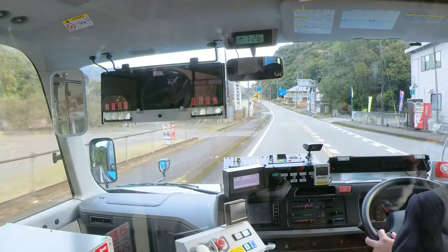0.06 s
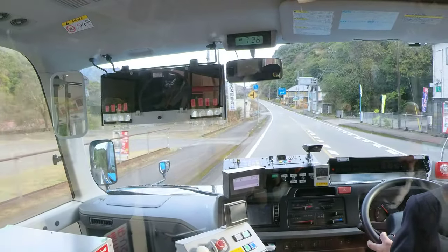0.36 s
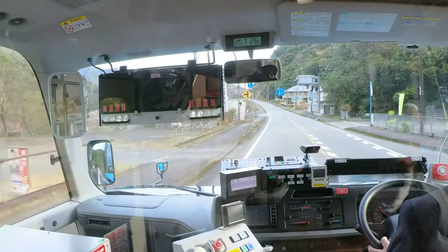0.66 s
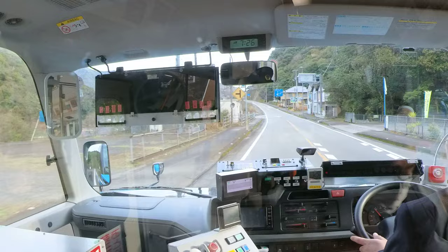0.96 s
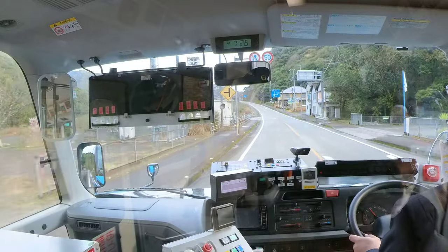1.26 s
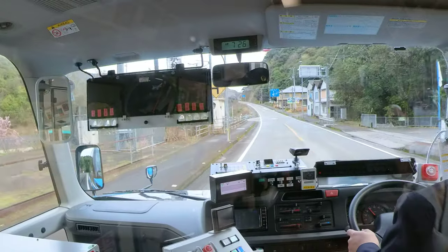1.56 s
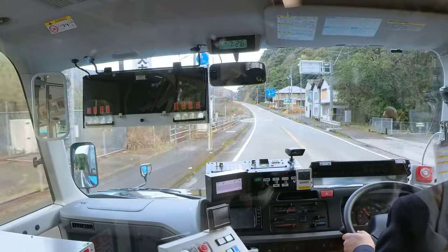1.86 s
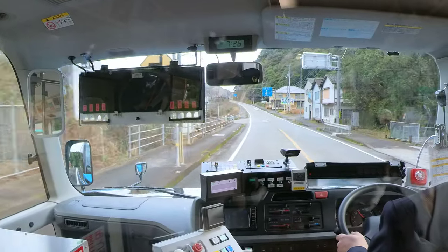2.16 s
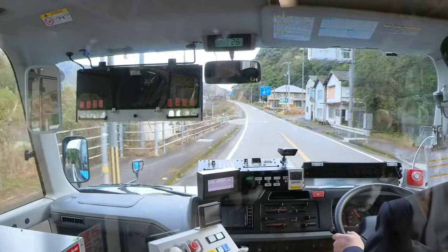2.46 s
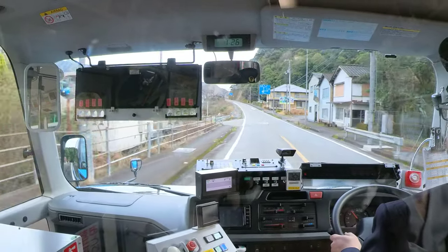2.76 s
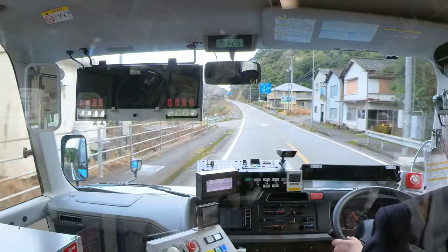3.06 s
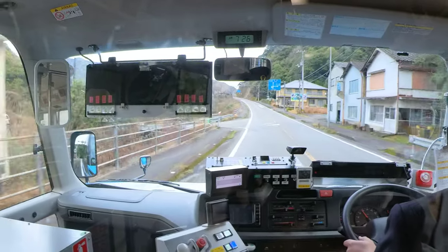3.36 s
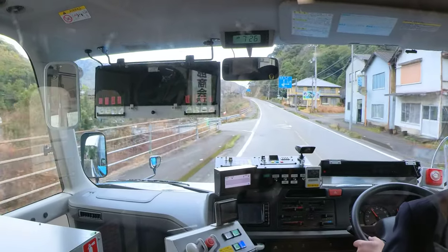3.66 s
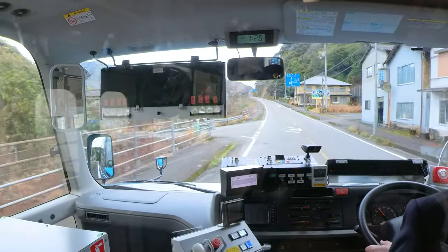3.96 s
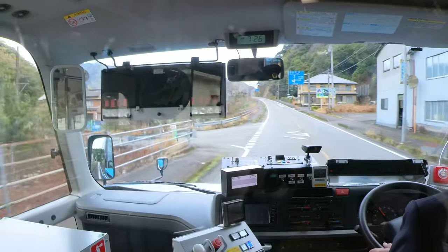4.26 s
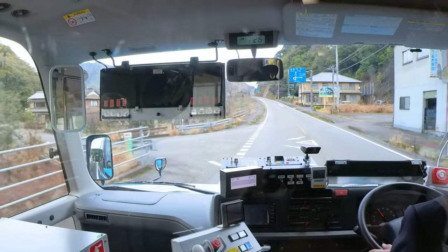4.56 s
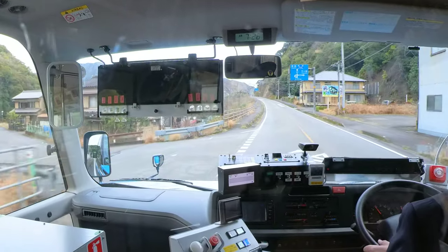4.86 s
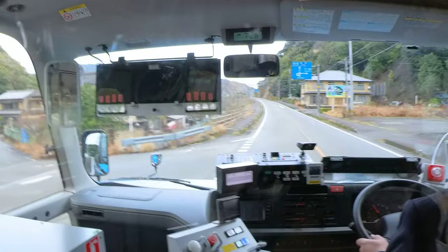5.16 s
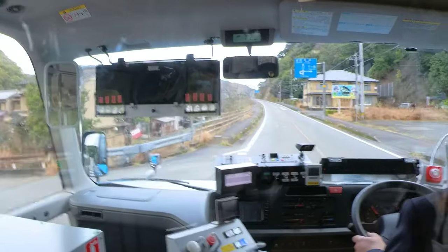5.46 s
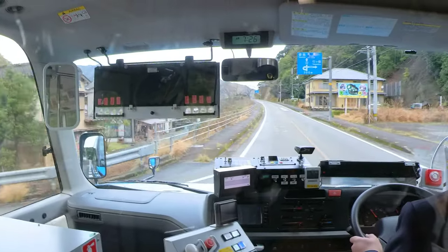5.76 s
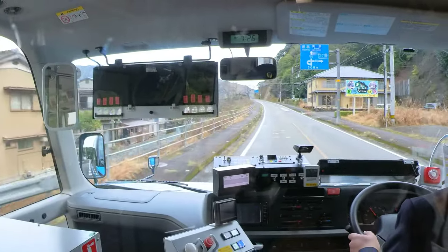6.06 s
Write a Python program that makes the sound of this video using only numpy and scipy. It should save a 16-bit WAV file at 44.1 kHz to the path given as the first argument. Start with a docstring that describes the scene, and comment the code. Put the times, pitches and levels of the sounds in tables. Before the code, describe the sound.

A minibus cruises along a road, heard from the cabin: tyres hum, the engine drones faintly, and bumps rattle the interior.

```python
"""Inside a minibus cruising on a country road. The tyre treads roar, the suspension rumbles and the air
in the tyres hums with a steady beat, all over a faint engine. Bumps knock the cabin panels, jingle
small metal fittings and make the trim squeak. Near the end the wheels slam into rough asphalt,
which sets the whole cabin clattering."""
import sys
import numpy as np
from scipy import signal
from scipy.fft import rfft, irfft, next_fast_len
from scipy.io import wavfile
from scipy.ndimage import map_coordinates

SR = 44100
rng = np.random.default_rng(int(sys.argv[2]) if len(sys.argv) > 2 else 0)


def wrap_up_sound(samples):
    """Save the sound to the file named by the first command line argument, as 16-bit audio."""
    columns = np.atleast_2d(samples).T
    # keep every value between -1 and 1, then stretch to whole-number steps
    tamed = np.clip(columns, -1, 1)
    steps = np.round(tamed * 32767).astype(np.int16)
    wavfile.write(sys.argv[1], SR, steps)


N = 269892
TIME = np.arange(N) / SR


# fader ride of the tread roar: (time [s], level [dB])
ROAR_LEVEL = [(0.0, -26), (0.8, -24), (1.26, -25.5), (5.1, -24.5), (5.35, -19.5), (5.71, -19.5),
              (6.12, -23)]
# its colour, full in the low mids: (frequency [Hz], relative level [dB])
ROAR_EQ = [(150, -38), (280, 1.5), (360, 0), (450, 2.5), (570, 0), (720, -3.5), (920, -3), (1250, -12),
           (1900, -21), (2700, -24), (3100, -30), (4200, -31.5), (5800, -57.5), (16000, -74.5)]
def tyre_roar():
    """Treads rolling on asphalt make a broad roar whose level wavers slightly."""
    return amp(automation(ROAR_LEVEL) + 0.64 * wobble(11)) * cabin_noise(ROAR_EQ)


# fader ride of the tyre hum: (time [s], level [dB])
HUM_LEVEL = [(0, -26), (1.1, -28), (2.6, -23.5), (3.25, -27), (4.3, -23.5), (6.12, -24)]
def cavity_hum():
    """Rolling splits the air resonance of a tyre into two close notes, which beat at a steady rate."""
    beat_hz, first_crest_s = 6.88, .104
    centre_hz = 238.5 + 1.4 * TIME + 1.5 * wobble(14)
    phase = 2 * np.pi * np.cumsum(centre_hz) / SR
    split = np.pi * beat_hz * (TIME - first_crest_s)
    upper, lower = np.sin(phase + split), np.sin(phase - split)
    return amp(automation(HUM_LEVEL) + 1.05 * wobble(8.4)) * (upper + 0.63 * lower)


# rough patches of asphalt:
# (start [s], length [s], rumble level [dB], panel level [dB], fitting level [dB])
PATCHES = [(0.8, 0.24, -22, -24, -38.5), (3.785, 0.072, -21, -29, -38), (4.189, 0.25, -24.5, -28.5, -41),
           (4.421, .13, -29.5, -27, -44), (5.142, .28, -15, -14, -20.5), (5.45, 0.13, -16.5, -18.5, -26.5),
           (5.583, 0.13, -14, -18.5, -29), (5.712, .22, -17, -26.5, -33), (5.939, 0.074, -19, -20, -24.5)]
def shaking(part, attack_s, sag_db_per_s, release_db_per_s):
    """Envelope of a shaken part: it builds up, sags while on a rough patch and dies away after it."""
    column = ("rumble", "panels", "fittings").index(part)
    power = np.zeros(N)
    for start, length, *levels in PATCHES:
        age = np.maximum(TIME - start, 0)
        sag = sag_db_per_s * np.minimum(age, length)
        release = release_db_per_s * np.maximum(age - length, 0)
        power += (amp(levels[column] - sag - release) * np.minimum(age / attack_s, 1)) ** 2
    return np.sqrt(power)


# bed of rumble under the patches: (time [s], level [dB])
RUMBLE_LEVEL = [(0, -28), (3.1, -29), (4.5, -26.5), (6.12, -22.5)]
# its bass-heavy colour: (frequency [Hz], relative level [dB])
RUMBLE_EQ = [(20, -43), (33, -34), (41, -22), (50, -28), (64, -7), (90, -1.5), (145, -2), (200, -3),
             (260, -2), (400, -21.5), (900, -64.5)]
def suspension_rumble():
    """The road rumbles through the suspension, swelling on each rough patch."""
    swells = shaking("rumble", attack_s=.03, sag_db_per_s=15, release_db_per_s=130)
    shocks = np.hypot(amp(automation(RUMBLE_LEVEL)), swells)
    return shocks * amp(1.05 * wobble(16)) * cabin_noise(RUMBLE_EQ)


# boxy panels, raspy trim and glittering metal: (frequency [Hz], relative level [dB])
PANEL_EQ = [(100, -84), (260, -4.5), (420, 6.5), (600, -2.5), (750, -16.5), (1150, -7.5), (1550, -10.5),
            (2000, -16), (2600, -16.5), (3100, -20), (4100, -18.5), (5500, -40.5), (10000, -51),
            (16000, -62.5)]
BUZZ_EQ = [(1200, -21), (2300, -2), (4000, -6), (5500, -21), (16000, -45.5)]
METAL_EQ = [(2500, -24.5), (5000, -14), (7000, -19.5), (8300, -14.5), (10000, -21), (10800, -10.5),
            (11700, -2.5), (13500, -2), (15600, -5.5), (16500, -1)]
def cabin_clatter():
    """Rough asphalt keeps panels and fittings in a dense clatter; hard shaking makes the trim buzz."""
    panel_shake = shaking("panels", attack_s=.014, sag_db_per_s=31, release_db_per_s=160)
    metal_shake = shaking("fittings", attack_s=.01, sag_db_per_s=25, release_db_per_s=220)
    clatter = unit(ringing(chatter(per_s=160, scatter_db=2), t60_s=.07, attack_s=.001))
    sizzle = unit(ringing(chatter(per_s=200, scatter_db=3), t60_s=.08, attack_s=.001))
    panels = panel_shake * cabin_noise(PANEL_EQ)
    buzz = amp(1) * panel_shake ** 2 * cabin_noise(BUZZ_EQ)
    metal = metal_shake * cabin_noise(METAL_EQ)
    return clatter * (panels + buzz) + sizzle * metal


# wheel slams: (time [s], level [dB])
JOLTS = [(5.137, -13.5), (5.185, -10.5), (5.235, -14), (5.599, -17.5)]
# dark colour of the shuddering body: (frequency [Hz], relative level [dB])
SHUDDER_EQ = [(50, -27), (130, -5.5), (260, -1), (400, 1.5), (600, 3), (750, -7), (1100, -6), (1600, -20),
              (4000, -38)]
def jolts():
    """The body shudders as the wheels hit broken asphalt."""
    times, db = np.transpose(JOLTS)
    return ringing(blows(times, db), t60_s=.35, attack_s=.003) * cabin_noise(SHUDDER_EQ)


# featured panel hits: (time [s], clack level [dB], thud over clack [dB])
KNOCKS = [(0.233, -22, 5.5), (0.3033, -25, 1.5), (0.7225, -29.5, 14.5), (0.8213, -21.5, 8.5),
          (0.885, -22.5, -3.5), (1.0248, -22.5, 0), (1.273, -29, -3), (1.401, -28.5, -12), (1.46, -28, -10),
          (2.068, -34, -9), (2.4817, -32, -7), (2.566, -31, 2.5), (2.734, -31, -8.5), (2.7721, -25, -4),
          (3.286, -25, 6), (3.671, -25, 0.5), (3.7766, -29.5, 15), (3.8534, -28.5, -7), (4.304, -22, 7.5),
          (4.365, -27, -2), (4.4274, -23.5, 6.5), (4.4923, -24.5, 5.5), (4.553, -23.5, 6.5),
          (5.264, -19.5, 5.5), (5.4752, -21, 11), (5.8105, -24.5, 15), (5.901, -23.5, -10.5),
          (6.0072, -21, 7.5)]
# how hard the road stirs the small taps and hops: (time [s], level [dB])
UNREST = [(0, -39), (1.4, -38.5), (2.3, -46), (2.75, -42.5), (3.05, -51), (3.7, -45.5), (4.4, -40),
          (6.12, -31.5)]
# hard clack and dull thud: (frequency [Hz], relative level [dB])
CLACK_EQ = [(500, -12.5), (900, -3.5), (1180, 9.5), (1270, -0.5), (1400, 9.5), (1730, 3.5), (1880, -8.5),
            (2700, -9), (4050, -18), (5500, -27.5), (10000, -34.5), (16000, -24.5)]
THUD_EQ = [(60, -34), (150, -0.5), (400, 2.5), (700, 0), (1200, -23), (3000, -64)]
def panel_knocks():
    """Bumps knock and tap the panels: a plastic clack over a thud, with more snap when the thud is light."""
    times, db, thud_db = np.transpose(KNOCKS)
    tap_thud_db, snap_per_thud = -4.5, -0.8  # the snap loses 0.8 dB for each dB of thud
    taps = amp(automation(UNREST) + 5.5) ** 2 * chatter(per_s=9, scatter_db=2.5)
    clacks = blows(times, db) + taps
    snaps = blows(times, db + snap_per_thud * thud_db) + taps * amp(snap_per_thud * tap_thud_db) ** 2
    thuds = blows(times, db + thud_db) + taps * amp(tap_thud_db) ** 2
    clack = ringing(clacks, t60_s=.13, attack_s=.001) * cabin_noise(CLACK_EQ)
    snap = ringing(snaps, t60_s=.17, attack_s=.00078) * cabin_noise(BUZZ_EQ)
    thud = ringing(thuds, t60_s=.1, attack_s=.00049) * cabin_noise(THUD_EQ)
    return clack + amp(-15.5) * snap + thud


def panel_boom():
    """A body panel booms once on a single low note."""
    peak_s, half_width_s, hz = 4.21, .026, 302
    swell = np.exp(-((TIME - peak_s) / half_width_s) ** 2)
    return amp(-18) * swell * tone(np.full(N, hz))


# featured hits of loose metal: (time [s], level [dB])
JINGLES = [(0.814, -24.5), (0.8664, -23), (0.999, -26), (1.564, -36), (2.836, -36.5), (3.6447, -32.5),
           (3.8023, -33), (4.148, -32), (4.28, -25), (4.486, -26.5), (4.5261, -25.5), (4.9312, -32),
           (5.1477, -11.5), (5.262, -12.5), (5.3727, -23.5), (5.4355, -15), (5.5174, -17.5)]
# thin colour of the tiny ticks: (frequency [Hz], relative level [dB])
TICK_EQ = [(6500, -39), (7900, -7.5), (8900, -2), (10500, -32)]
def jingles():
    """Loose metal lands with a click and bounces; in between it hops, trembles and faintly ticks."""
    times, db = np.transpose(JINGLES)
    bounce_times = times + .005 + .015 * rng.random(len(times))
    hops = chatter(per_s=17, scatter_db=3.5)
    tremble = amp(-9) ** 2 * chatter(per_s=46, scatter_db=5.5)
    stirring = amp(automation(UNREST)) ** 2 * (hops + tremble)
    contacts = blows(times, db) + blows(bounce_times, db - 9) + stirring
    tail = amp(-4) * ringing(contacts, t60_s=.18, attack_s=.00063)
    click = amp(3) * ringing(contacts, t60_s=.003, attack_s=.0001)
    ticks = ringing(chatter(per_s=6, scatter_db=3), t60_s=.025, attack_s=.0003) * cabin_noise(TICK_EQ)
    return np.hypot(tail, click) * cabin_noise(METAL_EQ) + amp(-57) * ticks


# pitched metal accents: (time [s], pitch [Hz], level [dB])
PINGS = [(5.353, 2565, -26), (5.354, 3590, -28), (5.677, 13500, -24.5)]
def pings():
    """Single fittings ring out briefly on the rough asphalt."""
    sound = np.zeros(N)
    for time, hz, db in PINGS:
        envelope = ringing(blows(np.array([time]), [db]), t60_s=.067, attack_s=.0007)
        sound += envelope * tone(hz + 90 * wobble(500))
    return sound


# trim squeaks: (time [s], length [s], pitch [Hz], level [dB], overtone gain [dB])
SQUEAKS = [(0.763, 0.023, 1311, -24.5, -5), (5.684, 0.028, 1284, -16, -11)]
# their overtones: (multiple of the pitch, level before the overtone gain [dB])
SQUEAK_OVERTONES = [(2, -2.5), (3.2, -14.5), (4.15, -22)]
def squeaks():
    """Trim sticks and slips unevenly for a few hundredths of a second; the cabin adds a short reverb."""
    direct = np.zeros(N)
    for start, length, hz, db, overtone_db in SQUEAKS:
        progress = np.clip((TIME - start) / length, 0, 1)
        rub = np.sqrt(np.abs(np.sin(np.pi * progress))) * amp(3 * wobble(500))
        pitch = hz * (1 + .04 * wobble(900))
        overtones = sum(amp(overtone_db + level) * tone(k * pitch) for k, level in SQUEAK_OVERTONES)
        direct += amp(db) * rub * (tone(pitch) + overtones)
    t = np.arange(SR // 4) / SR
    tail = rng.standard_normal((2, len(t))) * amp(-60 * t / .13)  # 60 dB down in 0.13 s
    reverb = signal.fftconvolve(direct[None], tail / np.linalg.norm(tail[0]), axes=1)[:, :N]
    return direct + amp(-7) * reverb


# engine and gear tones: (pitch [Hz], level before the effort gain [dB])
ENGINE_TONES = [(91, -40), (296, -37), (404, -42), (463, -37.5), (684, -43.5), (932, -38.5)]
# engine effort: (time [s], gain [dB])
ENGINE_EFFORT = [(0, -2), (1.4, -3), (1.8, 0.5), (3.2, -2), (4.2, -3), (6.12, -7)]
def engine():
    """Engine and gears drone faintly at a near-steady speed, each tone swelling by itself."""
    speed = 1 + .002 * wobble(3)
    drone = sum(amp(db + 2.5 * wobble(6)) * tone(hz * speed + 3 * wobble(25)) for hz, db in ENGINE_TONES)
    return amp(automation(ENGINE_EFFORT)) * drone


# stereo image of the cabin: (frequency [Hz], left-right correlation [-1..1])
CORRELATION = [(60, 0.94), (130, 0.85), (245, 1), (310, 0.96), (640, 0.91), (1400, 0.48), (2400, 0.086),
               (3200, -0.13), (4300, -0.42), (5500, -0.041), (7000, -0.0073), (15000, 0.019)]
def cabin_noise(eq):
    """Diffuse noise of rms 1, shaped by an EQ and rippled by cabin modes: narrow bass, wide treble."""
    modes = rng.standard_normal(700)

    def mid_side_gains(hz):
        ripple_db = 2.5 * map_coordinates(modes, [4 * np.sqrt(hz)]) * hz / (hz + 600)
        width = np.arccos(np.clip(along(CORRELATION, hz), -1, 1)) / 2
        return amp(along(eq, hz) + ripple_db) * [np.cos(width), np.sin(width)]

    mid, side = filtered(rng.standard_normal((2, N)), mid_side_gains)
    return unit(np.array([mid + side, mid - side]))


def blows(times, db):
    """The energy of each blow at its instant."""
    samples = np.clip(np.round(times * SR).astype(int), 0, N - 1)
    return np.bincount(samples, amp(db) ** 2, N)


def chatter(per_s, scatter_db):
    """Energy of contacts of uneven strength, scattered loosely around a regular pulse."""
    offset, size = rng.standard_normal((2, 4000))
    times = (np.arange(len(offset)) + offset / 2) / per_s
    inside = (times > 0) & (times < TIME[-1])
    return blows(times[inside], scatter_db * np.clip(size[inside], -2, 2))


def ringing(energy, t60_s, attack_s):
    """Envelope of densely spaced modes: each blow builds up, then dies away."""
    t = np.arange(SR // 2) / SR
    shape = 10 ** (-3 * t / t60_s) * (1 - np.exp(-t / attack_s))
    return np.sqrt(np.abs(signal.fftconvolve(energy, shape ** 2)[:N]))


def tone(hz):
    """A sine of rms 1 on a moving pitch."""
    return np.sqrt(2) * np.sin(2 * np.pi * np.cumsum(hz) / SR)


def wobble(per_s):
    """A smooth random curve through per_s points a second."""
    return map_coordinates(rng.standard_normal(int(N * per_s / SR) + 4), [TIME * per_s])


def automation(points):
    """(time, value) points joined into one value per sample."""
    return np.interp(TIME, *np.transpose(points))


def along(points, hz):
    """(frequency, value) points read on a log axis."""
    freqs, values = np.transpose(points)
    return np.interp(np.log(hz + 1), np.log(freqs + 1), values)


def filtered(x, response):
    """Apply a gain that depends on frequency."""
    size = next_fast_len(N + SR // 2)
    return irfft(rfft(x, size) * response(np.fft.rfftfreq(size, 1 / SR)), size)[..., :N]


def amp(db):
    """Decibels to gain."""
    return 10 ** (np.asarray(db) / 20)


def unit(x):
    """Scale to rms 1."""
    return x / np.sqrt(np.mean(x ** 2) + 1e-20)


# balance of the mix: (frequency [Hz], left over right [dB])
BALANCE = [(60, -3.9), (130, -2), (245, -2), (310, -.7), (1000, 0), (4000, 0), (8000, -2), (13000, -.3)]
def scene():
    """Everything heard from the front of the cabin, the bass leaning right."""
    road = tyre_roar() + cavity_hum() + suspension_rumble()
    body = cabin_clatter() + jolts() + panel_knocks() + panel_boom()
    fittings = jingles() + pings() + squeaks()
    mix = road + body + fittings + engine()
    return filtered(mix, lambda hz: amp(np.outer([.5, -.5], along(BALANCE, hz))))


def record(dry):
    """A soft clip rounds off the highest peaks, and a steep low-pass cuts the very top."""
    ceiling, cutoff_hz = .9, 15900
    rounded = dry / (1 + np.abs(dry / ceiling) ** 8) ** (1 / 8)
    return filtered(rounded, lambda hz: hz < cutoff_hz)


dry = scene()
out = record(dry)
wrap_up_sound(out)
```